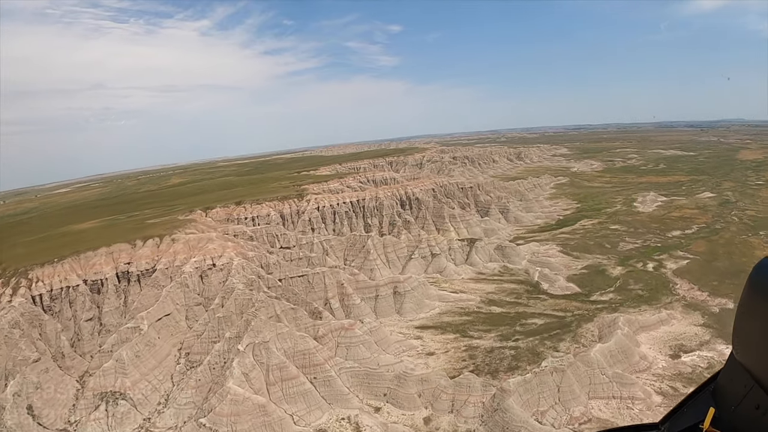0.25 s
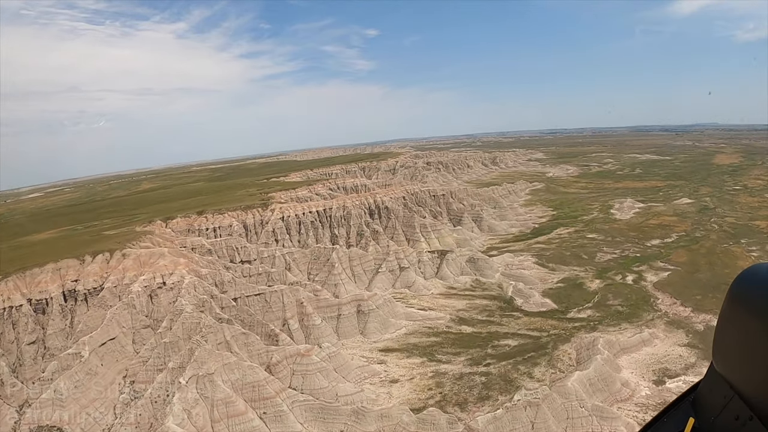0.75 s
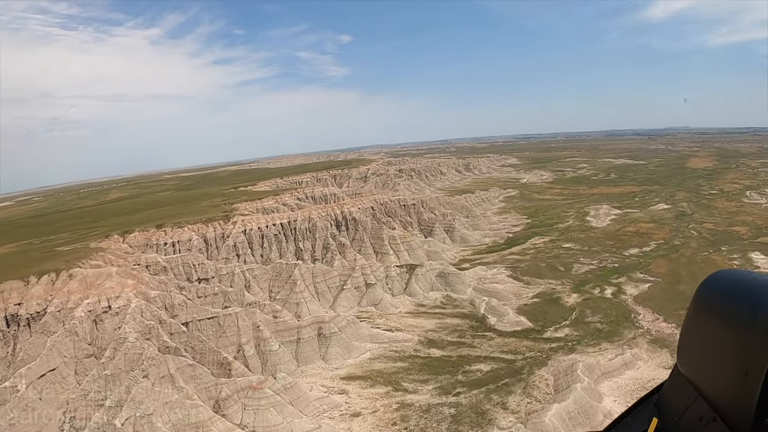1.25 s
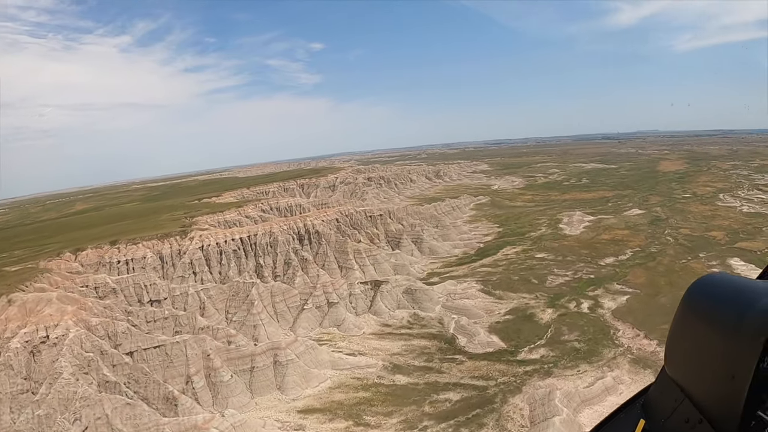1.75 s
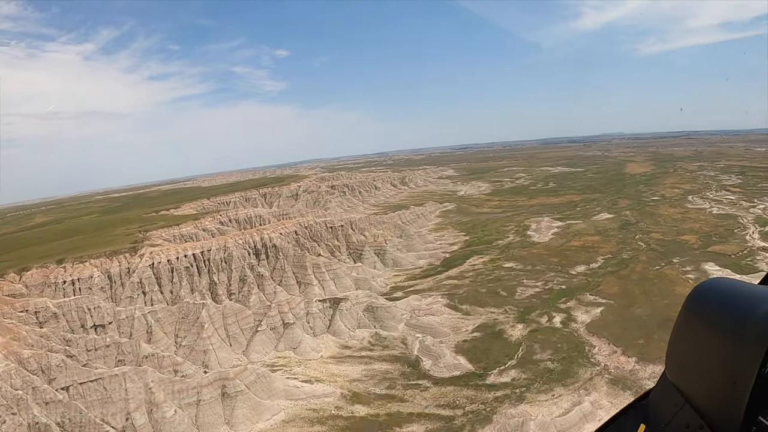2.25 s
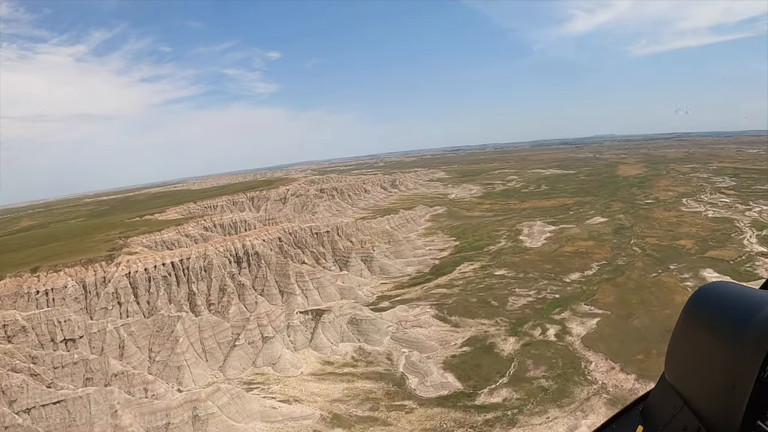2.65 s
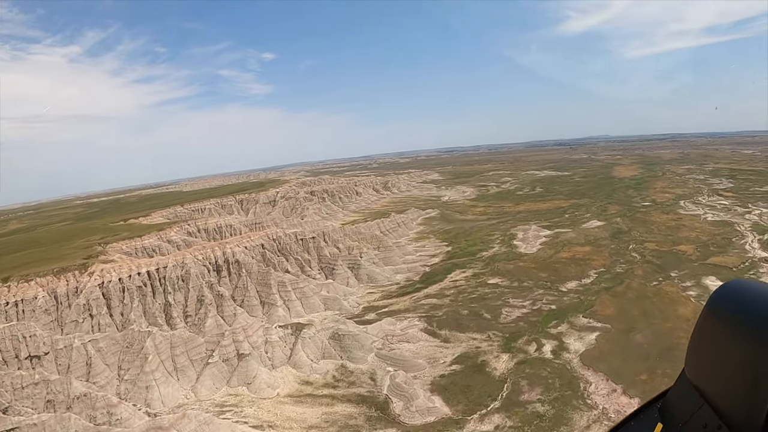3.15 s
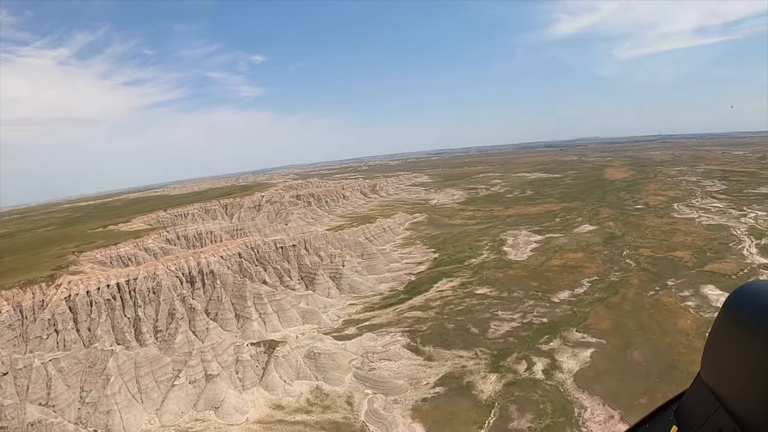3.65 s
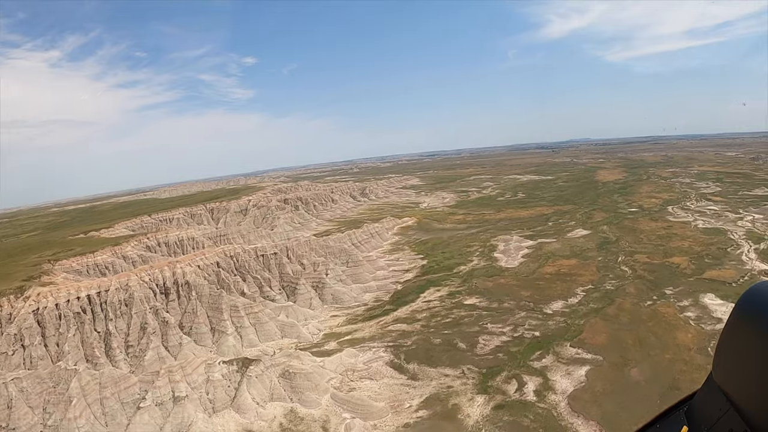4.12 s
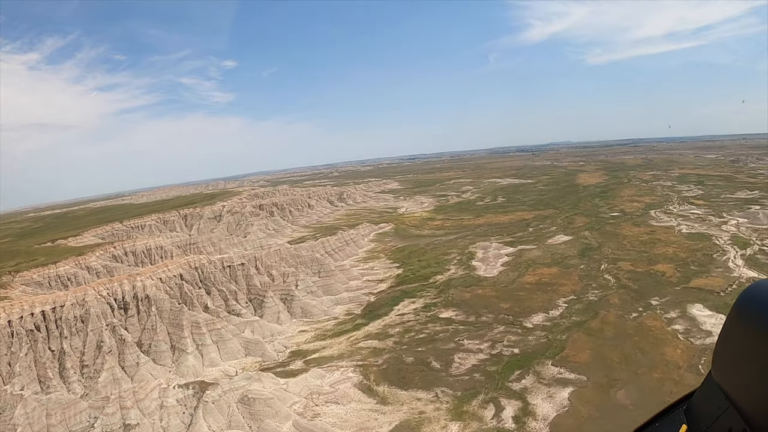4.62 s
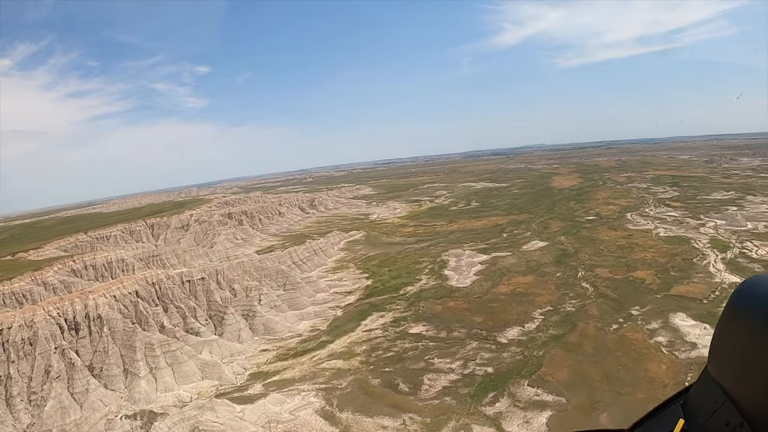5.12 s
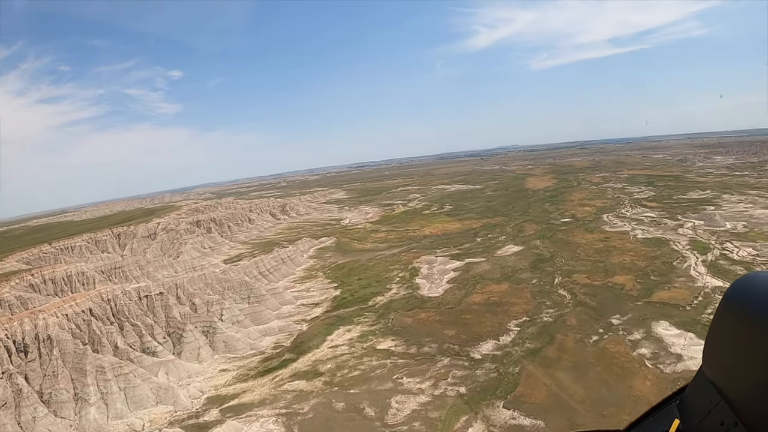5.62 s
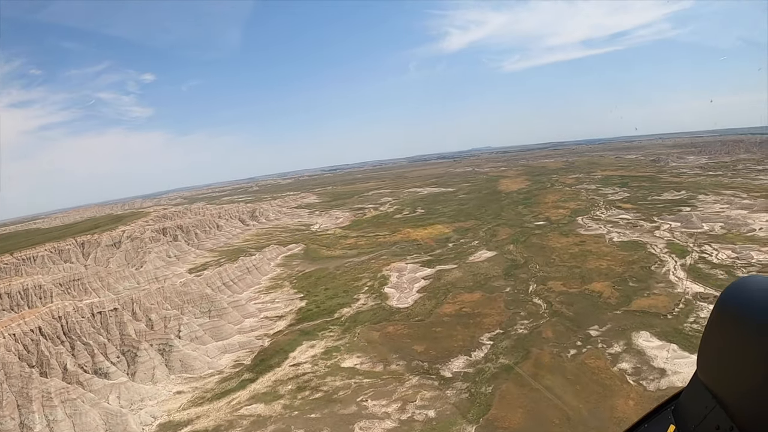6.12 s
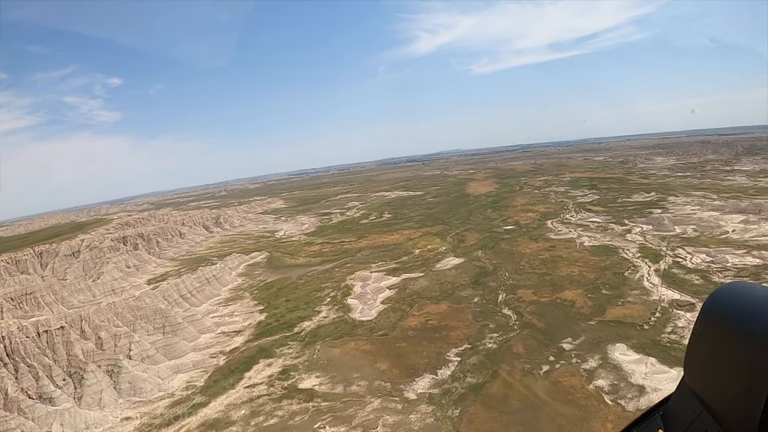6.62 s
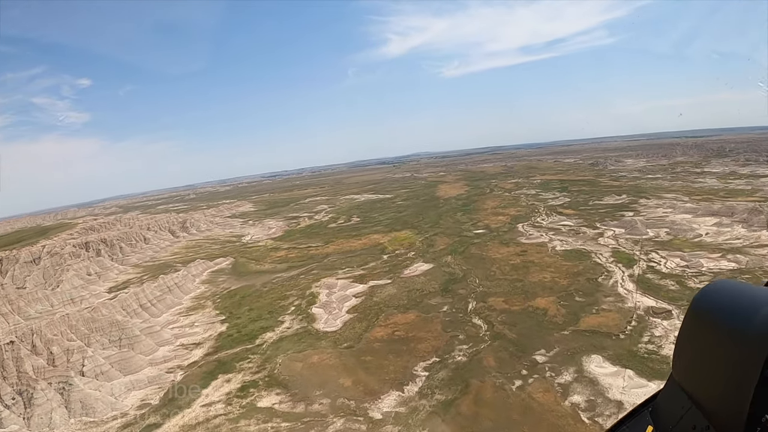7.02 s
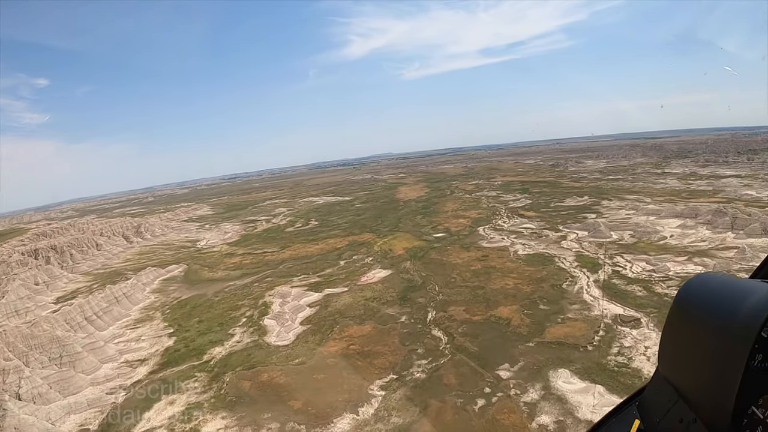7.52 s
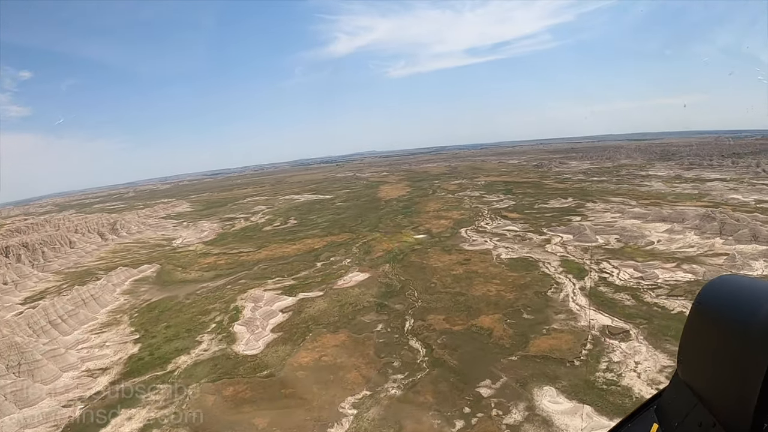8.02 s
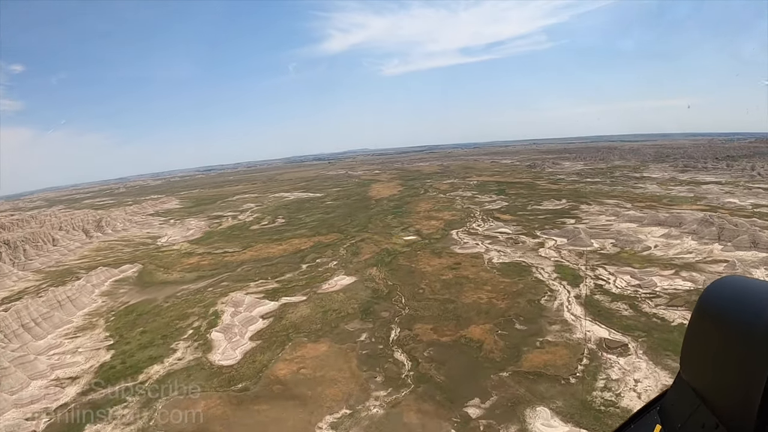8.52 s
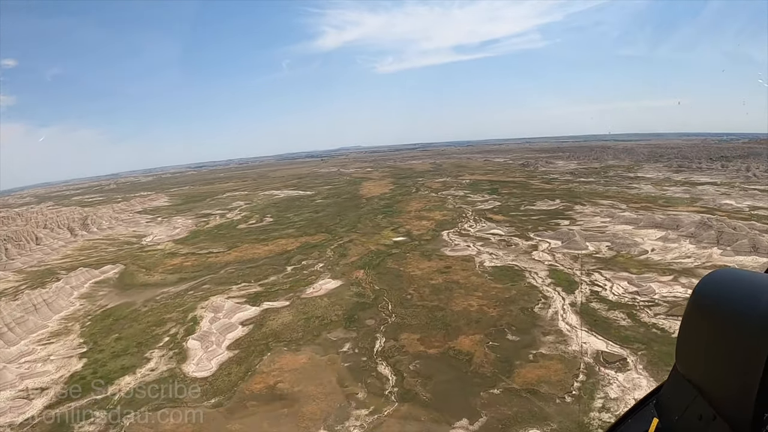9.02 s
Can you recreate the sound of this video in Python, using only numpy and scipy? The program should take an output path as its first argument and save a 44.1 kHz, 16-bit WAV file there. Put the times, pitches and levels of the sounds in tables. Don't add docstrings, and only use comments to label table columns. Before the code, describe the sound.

Close inside a small helicopter cabin, a deep, nearly steady piston-engine hum dominates, mixed with rotor tones and low airframe rumble. Six rapid blade slaps come in the first half second, then smooth cruise. Wind roars and hisses in wide stereo, a breathy whistle rises and fades, gusts thump softly, and trim creaks faintly now and then.

```python
import sys
import numpy as np
from scipy import signal
from scipy.fft import rfft, irfft, next_fast_len
from scipy.io import wavfile
from scipy.ndimage import uniform_filter1d

SR = 44100
rng = np.random.default_rng(int(sys.argv[2]) if len(sys.argv) > 2 else 0)


def unload_audio(sound):
    columns = np.transpose(np.atleast_2d(sound))
    steps = np.round(np.clip(columns, -1, 1) * 32767)
    wavfile.write(sys.argv[1], SR, steps.astype(np.int16))


def field_ratio(decibels):
    return 10 ** (np.asarray(decibels, dtype=float) / 20)


N = 408366


def rms_one(x):
    return x / np.sqrt(np.mean(x ** 2) + 1e-20)


def columns(rows, at):
    first, *rest = np.transpose(rows)
    return [np.interp(at, first, column) for column in rest]


def bump(t, centre_s, length_s):
    return np.exp(-(2 * (t - centre_s) / length_s) ** 2)


def two_pole_noise(pole, shape):
    white = rng.standard_normal(shape)
    return signal.lfilter([1], [1, -2 * pole, pole * pole], white)[..., 4000:]


def drift(rate_hz, step):
    slow = two_pole_noise(np.exp(-80 * np.pi * rate_hz / SR), N // 40 + 4002)
    return np.interp(np.arange(0, N, step) / 40, np.arange(len(slow)), rms_one(slow - slow.mean()))


def narrow_noise(centre_hz, width_hz):
    slow = two_pole_noise(np.exp(-np.pi * width_hz / SR), (2, len(centre_hz) + 4000))
    angle = 2 * np.pi * np.cumsum(centre_hz) / SR
    return rms_one(slow[0] * np.cos(angle) + slow[1] * np.sin(angle))


def cabin_noise(spectrum):
    # centre in Hz, width in Hz, gain in dB.
    resonances = [(151.5, 7.2, 5), (166.4, 6.5, -1.5), (201, 27, 2), (257, 23, -1.5), (306, 14, -2),
                  (384, 39, 2.5), (404, 14, 2.5), (427, 13, -3), (448, 27, 1.5), (506, 27, -2),
                  (643, 50, 1.5), (710, 36, -2), (772, 32, 5), (865, 28, -1.5), (912, 36, 4.5),
                  (1033, 74, 3.5), (1152, 50, 3), (1350, 50, 2.5), (2094, 130, 2.5), (2470, 80, -4.5),
                  (2640, 250, 0.5), (4900, 280, 1)]
    # frequency in Hz, likeness 0-1, right lead in radians, left minus right in dB.
    ports = [(20, .998, 0, .4), (100, .998, 0, .3), (200, 0.96, 0, 1.5), (290, 0.97, 0, 1),
             (550, 0.87, 0.26, 2.5), (1000, .85, .5, 1.5), (1550, 0.5, 0.75, .5), (2050, 0.93, 0.42, 2),
             (2800, .66, 1.36, 5), (3550, .55, 0.96, 3.5), (4280, .2, -0.5, 3.5), (5500, .1, 1, 2),
             (6360, .25, 1.5, 2.5), (7500, .5, 4, 1.5), (8500, .12, 4.5, -2.5), (10400, .33, 4, 2.5),
             (12000, 0.1, 2.5, -2.2)]
    size = next_fast_len(N)
    hz = np.maximum(np.arange(size // 2 + 1) * SR / size, 1)
    point_hz, point_db = np.array(spectrum, float).T
    db = np.interp(np.log(hz), np.log(point_hz), point_db, left=-90, right=-90)
    for centre_hz, width_hz, peak_db in resonances:
        db = db + peak_db / (1 + (2 * (hz - centre_hz) / width_hz) ** 2)
    alike, lead_rad, pan_db = columns(ports, hz)
    alike = np.clip(alike, 0, 1)
    shared, own = rfft(rng.standard_normal((2, size))) * field_ratio(db)
    right = alike * np.exp(1j * lead_rad) * shared + np.sqrt(1 - alike ** 2) * own
    pair = irfft(np.array([shared * field_ratio(pan_db / 2), right * field_ratio(-pan_db / 2)]), size)[:, :N]
    return pair / np.std(pair.mean(axis=0))


def tones(turns, table, wobble_db, slip_rad, order=1):
    out = 0
    for multiple, db in table:
        opposed_turns = .5 * (round(multiple) % order > 0)
        angle = 2 * np.pi * (int(round(multiple)) * turns[::8] + opposed_turns)
        angle = angle + slip_rad * drift(1.5, step=8)
        out = out + field_ratio(db + wobble_db * drift(1.2, step=8)) * np.sqrt(2) * np.cos(angle)
    return signal.resample_poly(out, 8, 1, padtype="line")[:N]


def governed_firing(t):
    # time in seconds, firing rate in Hz.
    firing = [(0.0, 137.54), (0.4, 137.8), (1.2, 135.32), (1.6, 135.45), (2.0, 135.96), (2.8, 135.8),
              (3.6, 137.02), (5.2, 136.43), (6.0, 136.88), (6.8, 135.98), (8.0, 136.69), (8.4, 136.56),
              (8.8, 136.69), (9.26, 138.04)]
    return columns(firing, t)[0]


def firing_hum(t, cycles, firing_hz):
    # centre in seconds, sag depth in dB (negative swells).
    sags = [(.44, 3), (1.78, 2.5), (2.1, 1.5), (3.1, 3), (3.45, 1), (4.64, -1), (6.6, 0), (7.5, .8),
            (9.12, 3)]
    level_db, loss_db_per_hz, cruise_hz, sag_s = -14.5, 0.3, 137, .07
    hum_db = level_db - loss_db_per_hz * (firing_hz - cruise_hz)
    hum_db = hum_db - sum(depth_db * bump(t, s, 2 * sag_s) for s, depth_db in sags)
    return field_ratio(hum_db + 0.13 * drift(1.1, step=1)) * np.sqrt(2) * np.cos(2 * np.pi * 6 * cycles)


def engine_orders(cycles):
    # multiple of the cycle rate, rms level in dB.
    orders = [(2, -44.5), (3, -28), (4, -36.5), (5, -47), (7, -33), (8, -48), (10, -37), (11, -38.5),
              (12, -36), (13, -41), (14, -48.5), (16, -40.5), (17, -44.5), (19, -47), (20, -43.5),
              (22, -44.5), (29, -44), (34, -48), (85, -53)]
    return tones(cycles, orders, wobble_db=1.14, slip_rad=0.12, order=3)


def main_rotor(passes):
    # multiple of the pass rate, rms level in dB.
    harmonics = [(1, -33.5), (2, -49.5), (3, -34), (4, -26.5), (5, -40), (7, -46.5)]
    return tones(passes + .453, harmonics, wobble_db=1.5, slip_rad=.1)


def tail_rotor(cycles):
    # multiple of the turn rate, rms level in dB.
    harmonics = [(1, -33.5), (2, -27), (4, -41.5), (6, -34.5), (8, -42)]
    turns_per_cycle, start_turns = 1.772486, -.1772
    return tones(turns_per_cycle * cycles + start_turns, harmonics, wobble_db=1.9, slip_rad=0.078)


def blade_slaps():
    # time in seconds, peak in dB.
    slap_rows = [
        (.0035, -12),
        (.0766, -6.5),
        (.1497, -7.5),
        (.2232, -8.5),
        (.2965, -15),
        (.3683, -10),
    ]
    # delay in seconds, level in dB.
    echoes = [
        (.0043, -2.5),
        (0.01, -8),
    ]
    pulse_hz, pulse_s = 560, .0009
    clicks = np.zeros(N)
    for s, db in slap_rows:
        for lag_s, echo_db in [(0, 0.0042)] + list(echoes):
            clicks[round((s + lag_s) * SR)] -= field_ratio(db + echo_db) * np.sign(.008 - lag_s)
    t = np.arange(-200, 201) / SR
    pulse = np.cos(2 * np.pi * pulse_hz * t) * np.exp(-(t / pulse_s) ** 2)
    return np.convolve(clicks, pulse, "same")


def airflow(t):
    # time in seconds, strength in dB.
    flow = [(0, -4), (.06, 1.5), (.1, -5.5), (.17, -3.5), (.22, 0), (.4, 0), (.47, 0), (1, 0.5), (3.2, .6),
            (4, 0), (5, 0), (5.6, -1), (6.4, 0), (7.8, -1), (8.1, 0), (9.26, -1)]
    return columns(flow, t)[0]


def airframe_rumble():
    # frequency in Hz, density in dB per Hz.
    spectrum = [(30, -26), (48, -5), (60, 0.5), (75, -4), (95, -4.5), (110, -1), (130, -29)]
    return field_ratio(-27.5) * cabin_noise(spectrum)


def air_roar(flow_db):
    # frequency in Hz, density in dB per Hz.
    spectrum = [(95, -32), (120, -2), (155, 2), (190, -5), (230, -0.5), (310, -2), (340, -7), (500, -10),
                (800, -14), (1200, -17), (1500, -23.5), (1900, -44)]
    return field_ratio(-20 + 0.46 * flow_db) * cabin_noise(spectrum)


def air_hiss(flow_db):
    # frequency in Hz, density in dB per Hz.
    spectrum = [(880, -26.5), (1500, -3), (1820, -5), (2060, -3), (2460, -2.5), (2670, -3), (3160, -3.5),
                (4420, -12), (4900, -13), (7600, -22), (10900, -35), (12200, -38), (13600, -45),
                (16000, -58.5)]
    return field_ratio(-33 + flow_db + 0.13 * drift(2.7, step=1)) * cabin_noise(spectrum)


def blade_swish(passes, flow_db):
    # frequency in Hz, density in dB per Hz.
    spectrum = [(3500, -31), (4500, -4), (6500, 0), (7800, 0), (8600, -10.5), (10000, -12), (10800, -16.5),
                (11800, -12), (12700, -14), (13800, -25), (16000, -36)]
    shifted = passes + .24
    count = np.floor(shifted - np.floor(shifted[0])).astype(int)
    part = shifted % 1 / .2
    blade_gain = field_ratio(.9 * rng.standard_normal(N // 1000))
    puff = (part * np.exp(-part)) ** 2.2 * blade_gain[count]
    return field_ratio(-53 + 1.6 * flow_db) * rms_one(puff) * cabin_noise(spectrum)


def gap_whistle(t):
    # time in seconds, centre in Hz, level in dB.
    gap = [(0, 1600, -52), (.6, 1800, -46), (1.2, 2140, -43), (2.7, 2506, -47), (3.2, 2821, -43.5),
           (3.7, 2898, -46.5), (4.3, 2698, -44.5), (5.5, 2303, -54.5), (9.26, 2195, -57.5)]
    centre_hz, db = columns(gap, t)
    return field_ratio(db) * narrow_noise(centre_hz, width_hz=490) * field_ratio([[1.5], [-1.5]])


def buffeting(t):
    # frequency in Hz, density in dB per Hz.
    spectrum = [(10, -19.5), (18, -11), (28, -8), (40, -3.5), (52, -2.5), (70, -25)]
    # centre in seconds, length in seconds, peak in dB.
    gusts = [(.15, .25, -26), (.4, 0.16, -21.5), (1.3, .15, -28), (1.55, .2, -27), (1.85, 0.13, -31),
             (2.5, 0.27, -31), (3.548, 0.16, -27), (4.3, .4, -31.5), (5.3, .4, -28.5), (5.85, .2, -28),
             (6.5, 0.11, -29), (7.9, .2, -31), (8.2, 0.14, -30.5), (8.56, .12, -26), (9.13, 0.22, -22)]
    calm_db = -33
    swell = field_ratio(calm_db) + sum(field_ratio(db) * bump(t, s, length_s) for s, length_s, db in gusts)
    return swell * cabin_noise(spectrum)


def trim_creaks():
    # start in seconds, length in seconds, first Hz, last Hz, level in dB.
    creak_rows = [
        (.5, .3, 1610, 1610, -45),
        (.95, .12, 1610, 1620, -47),
        (3.1, .25, 1700, 1500, -43),
        (4.75, .24, 1600, 1870, -44),
    ]
    # start in seconds, pitch in Hz, level in dB.
    squeak = [
        (6.385, 1950, -40),
        (6.39, 1770, -37),
        (6.4, 1580, -38),
    ]
    squeak_s, squeak_sag, squeak_width_hz = .063, .025, 8
    rubs = []
    for s, length_s, first_hz, last_hz, db in creak_rows:
        rubs.append((s, length_s, first_hz, last_hz, 25 + .3 * abs(last_hz - first_hz), db))
    for s, hz, db in squeak:
        rubs.append((s, squeak_s, hz, hz * (1 - squeak_sag), squeak_width_hz, db))
    out = np.zeros(N)
    for s, length_s, first_hz, last_hz, width_hz, db in rubs:
        part = np.minimum(np.arange(SR // 2) / SR / length_s, 1)
        rub = narrow_noise(first_hz + part * (last_hz - first_hz), width_hz)
        rub = rub / np.std(rub[part < 1])
        out[round(s * SR):][:SR // 2] += field_ratio(db) * np.sin(np.pi * part) * rub
    return out


def scene():
    t = np.arange(N) / SR
    firing_hz = governed_firing(t)
    cycles = np.cumsum(firing_hz) / SR / 6 - .0585
    passes = .595686 * cycles - .2367
    machine = firing_hum(t, cycles, firing_hz) + engine_orders(cycles)
    machine += main_rotor(passes) + tail_rotor(cycles)
    machine += blade_slaps() + trim_creaks()
    flow_db = airflow(t)
    air = airframe_rumble() + air_roar(flow_db) + air_hiss(flow_db)
    air += blade_swish(passes, flow_db) + gap_whistle(t) + buffeting(t)
    one_late = np.r_[machine[:1], machine[:-1]]
    return np.array([machine, one_late]) * field_ratio([[.22], [-.22]]) + air


def top_cut(x):
    return signal.sosfilt(signal.butter(12, 15900, fs=SR, output="sos"), x)


def record(dry):
    knee_db, squeeze, release_db_per_s = -7, .6, 50
    over_db = np.maximum(20 * np.log10(np.abs(dry).max(axis=0) + 1e-9) - knee_db, 0)
    fall_db = release_db_per_s * np.arange(N) / SR
    held_db = np.maximum.accumulate(over_db + fall_db) - fall_db
    held_db = uniform_filter1d(held_db, size=201)
    return top_cut(dry * field_ratio(1.19 - squeeze * held_db))


dry = scene()
out = record(dry)
unload_audio(out)
```